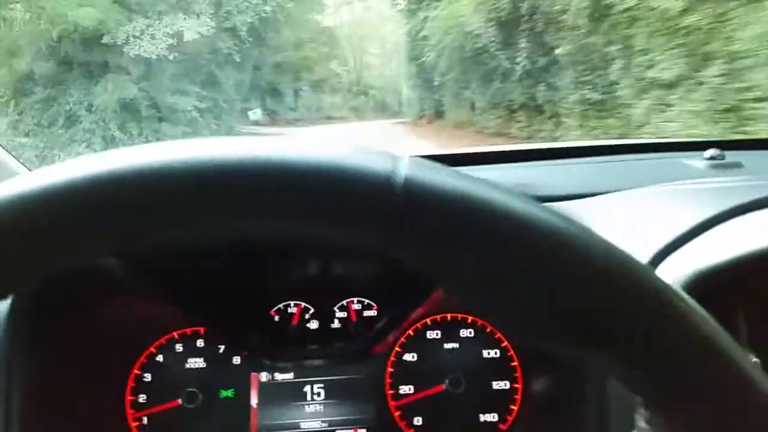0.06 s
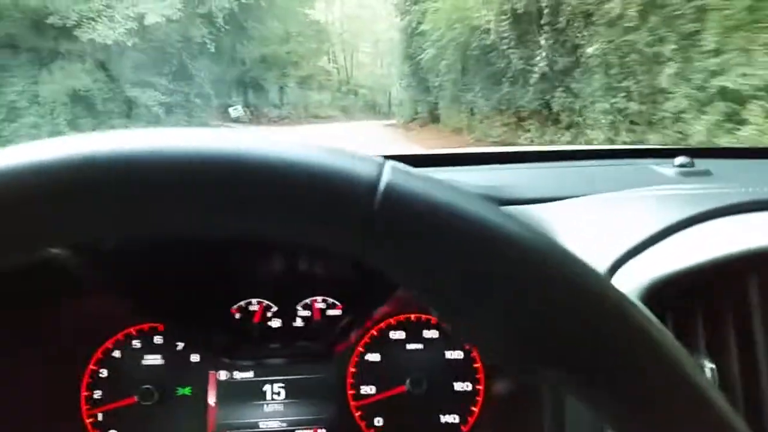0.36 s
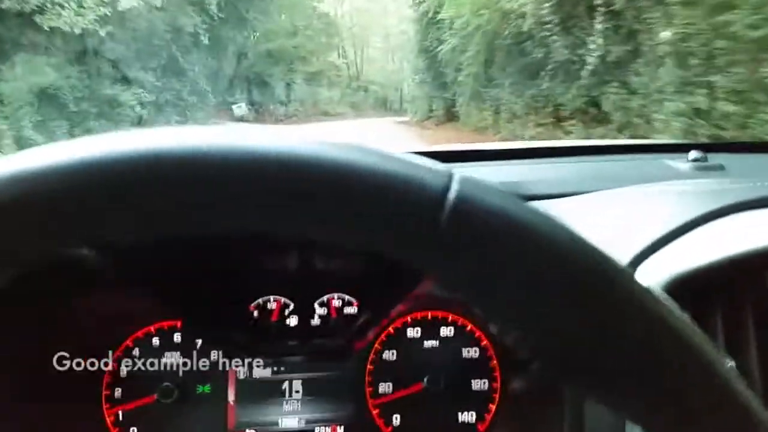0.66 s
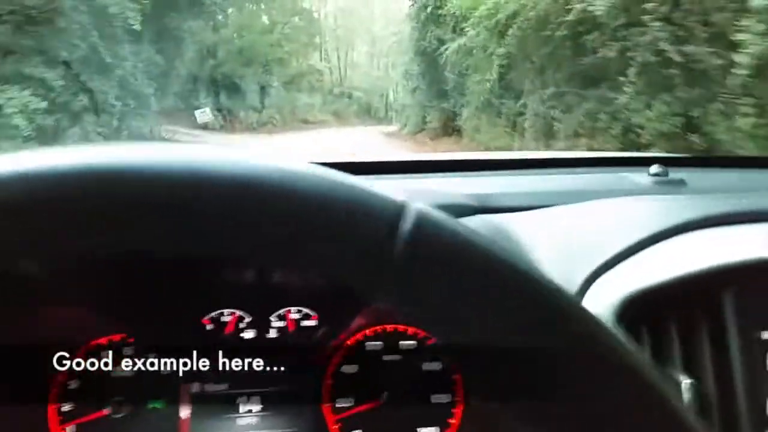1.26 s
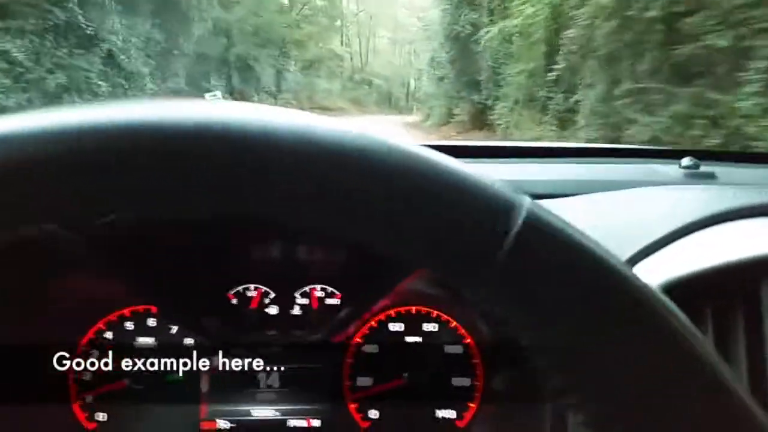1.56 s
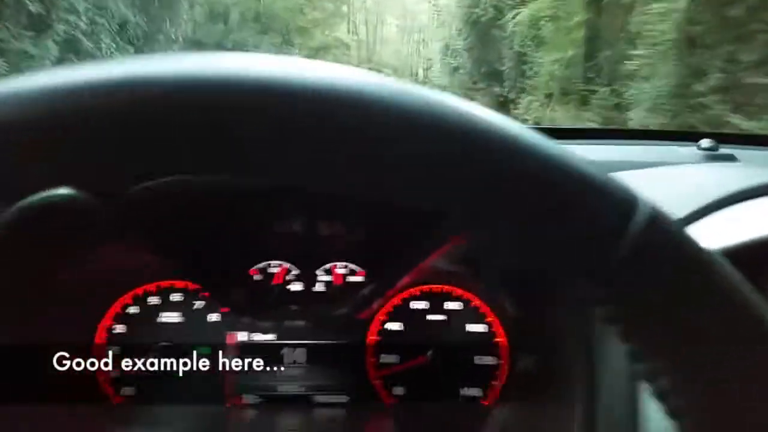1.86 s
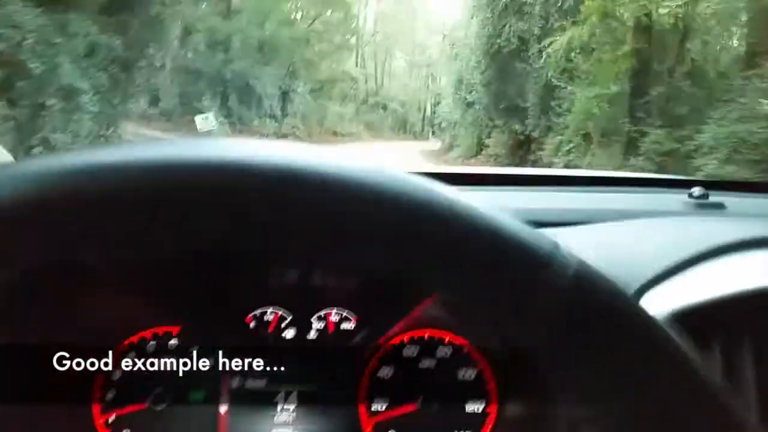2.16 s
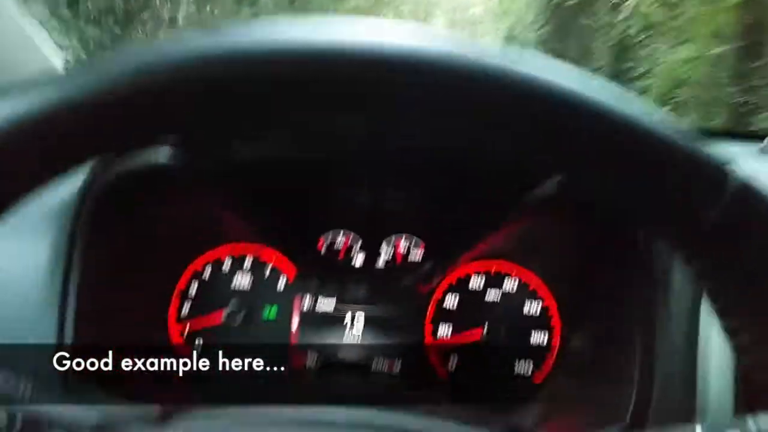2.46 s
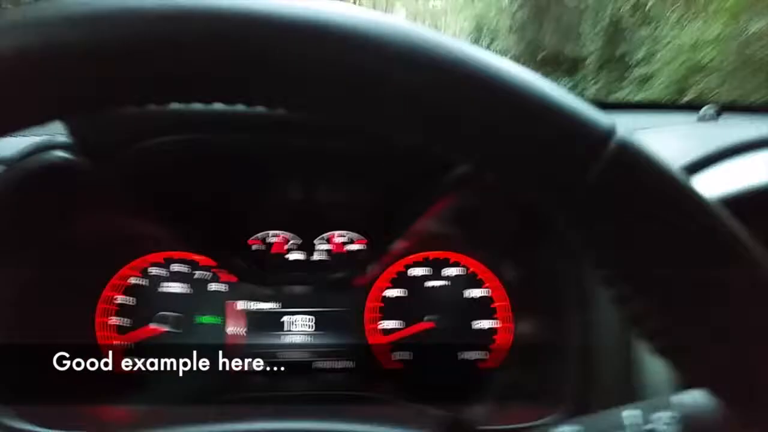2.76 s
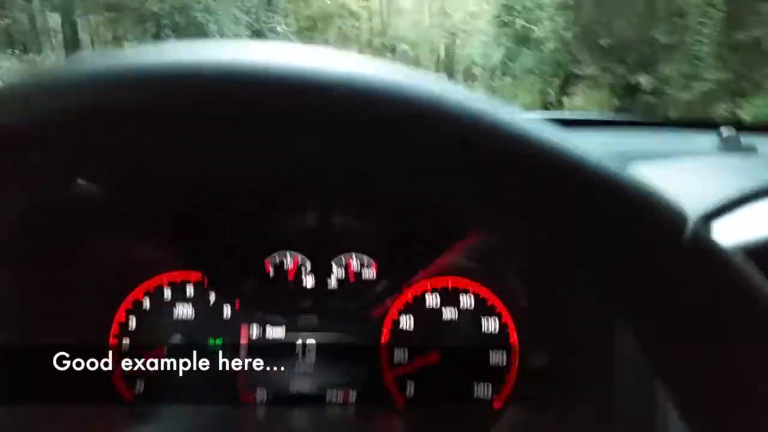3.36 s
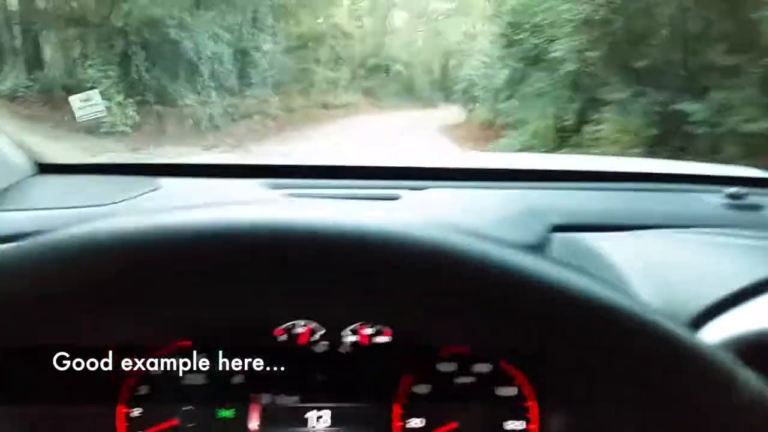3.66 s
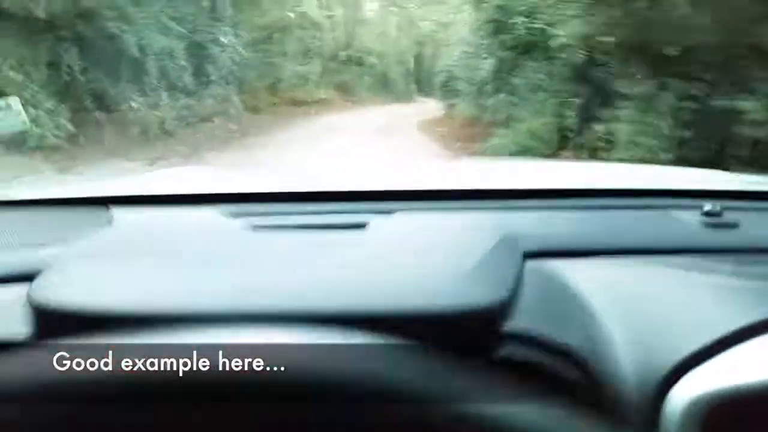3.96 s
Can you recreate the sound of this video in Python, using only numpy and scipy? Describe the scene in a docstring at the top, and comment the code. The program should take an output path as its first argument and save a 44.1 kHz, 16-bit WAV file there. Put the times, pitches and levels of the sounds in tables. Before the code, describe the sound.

A vehicle rumbles slowly over a rough dirt road, heard from the driver's seat, with a low cabin boom and dull tyre roar throughout. The suspension clunks irregularly, most densely between 1 and 2 seconds. At about 2.2 seconds a deep bump brings a brief gravel crunch, plastic rattle and light metal jingle. Another thump lands near 2.8 seconds, and scattered clunks continue until about 3.9 seconds.

```python
"""Driving on a rough dirt road

From the driver's seat of a slow vehicle, you hear uneven ground shake the body and make the cabin boom.
The floor drums, the tyres roar dully on grit, and the suspension clunks at the ruts.
Two deep bumps thump the body. The first also crunches gravel, shakes the plastic trim
and sets small loose metal jingling. A faint hiss lies under it all."""
import sys
import numpy as np
from scipy import signal
from scipy.fft import rfft, irfft
from scipy.io import wavfile
from scipy.ndimage import uniform_filter1d

SR = 44100
rng = np.random.default_rng(int(sys.argv[2]) if len(sys.argv) > 2 else 0)


def log_audio(samples):
    """Write samples as a 16-bit WAV file to the path given in sys.argv[1]."""
    # one column per channel
    frames = np.atleast_2d(samples).T
    # limit to full scale, then quantise
    limited = np.clip(frames, -1, 1)
    pcm = np.round(limited * 32767).astype(np.int16)
    wavfile.write(sys.argv[1], SR, pcm)


N = 176400  # 4 seconds

# How each low sound swells and fades: time_s, relative_level_db
SHUDDER_LEVEL = [(0.0, -21), (0.49, -19), (1.06, -22), (1.28, -16), (1.53, -29), (1.66, -15), (1.79, -34),
                 (1.86, -17), (2.81, -19.5), (2.84, -12.5), (2.95, -20.5), (3.8, -28.5), (3.82, -21),
                 (4.0, -29.5)]  # deep shaking of the body
BOOM_LEVEL = [(0.0, -43), (0.02, -19.5), (0.42, -24), (0.47, -18.5), (0.73, -24), (1.15, -17), (1.2, -21.5),
              (2.05, -18), (2.24, -14), (2.27, -20.5), (2.75, -22), (2.77, -14), (3.07, -21.5), (3.4, -22),
              (3.43, -27.5), (4.0, -23)]  # boom of the cabin
THRUM_LEVEL = [(0.0, -45), (1.73, -38.5), (2.1, -44.5), (2.16, -31), (2.28, -40.5), (2.72, -42),
               (2.81, -28.5), (2.85, -40), (3.39, -51.5), (3.48, -42), (3.94, -48), (4.0, -41)]  # low note of the floor panels
HOLLOW_LEVEL = [(0, -53), (1.0, -53), (1.4, -47), (2.1, -47), (2.2, -42.5), (2.45, -44), (2.72, -49),
                (2.8, -35), (2.9, -48), (3.3, -55), (3.6, -47), (3.85, -46.5), (4, -52)]  # their higher, hollow note
ROAR_LEVEL = [(0.0, -41.5), (1.09, -43), (1.2, -41), (1.84, -41), (2.25, -36.5), (2.56, -40.5), (2.72, -39),
              (2.96, -39.5), (3.14, -44), (3.43, -43.5), (3.68, -43), (4.0, -44)]  # tyres

# The tone of each noise, or how strong it is from low to high: pitch_hz, relative_level_db
RUMBLE_TONE = [(14, -8.5), (26, -1), (35, 4.5), (50, -12), (64, -0.5), (77, -3), (98, -12.5), (124, -6),
               (145, -14), (170, -22), (200, -26.5), (300, -37.5)]  # body and cabin
SCRAPE_TONE = [(300, -4), (420, 2.5), (600, 0), (750, -5), (1000, -13), (1300, -14), (1600, -10.5),
               (1850, -17), (2100, -22), (2500, -35), (4000, -53), (8000, -81)]  # scrape inside a clunk
PANEL_TONE = [(190, -4.5), (235, 2), (270, -4.5), (315, -7), (362, -0.5), (410, -12.5), (460, -12.5)]  # floor panels
ROAR_TONE = [(88, -27.5), (150, 0.5), (163, -3), (187, -16.5), (255, -15.5), (385, -26), (465, -32),
             (551, -33), (701, -30), (764, -37), (818, -36.5), (1110, -46), (1280, -44.5), (1600, -51),
             (2060, -55), (6840, -87.5), (9000, -94), (11700, -113), (19800, -120)]  # tyres
TRIM_TONE = [(900, -1), (1300, -0.5), (1700, 3.5), (2250, 1), (2600, -16), (3500, -22.5), (5000, -37.5),
             (9000, -50)]  # plastic trim
GRAVEL_TONE = [(530, -30.5), (900, 0.5), (1190, -3.5), (1430, -7), (1680, -2), (1840, -10), (2270, -9.5),
               (2600, -12.5), (5100, -32), (9000, -39.5), (11700, -67.5), (19800, -120)]  # crunching gravel
METAL_TONE = [(7000, -30), (9000, -19.5), (10000, -5.5), (10600, 0.5), (11500, -1), (12300, 1.5),
              (13000, -6), (14000, -10), (15600, -8)]  # loose metal
HISS_TONE = [(2940, -34), (5000, -4.5), (7150, -24), (8240, -19), (9640, -13.5), (11900, -0.5),
             (15600, 0.5)]  # microphone hiss

# Thumps of the body over bumps (fade is the time to drop 60 dB): start_s, pitch_hz, level_db, rise_s, fade_s
THUMPS = [(1.101, 70, -14, 0.021, 0.11), (1.939, 128.3, -22, .025, 0.18), (2.125, 92.2, -12, .03, .22),
          (2.197, 69.1, -6, .022, 0.17), (2.755, 126, -8.5, .014, 0.26), (2.78, 162, -19, 0.0195, 0.25),
          (2.765, 410, -31, .02, .2), (2.821, 44, -10, .03, 0.28)]
# Clunks of the suspension: start_s, level_db, hardness_db
CLUNKS = [(.353, -35, 4), (.518, -30, -3), (.597, -37, -3), (0.764, -22.5, 1), (.794, -32, 4),
          (1.082, -21.5, 2), (1.269, -20, 1), (1.305, -33.5, 0), (1.33, -28, 4), (1.347, -22.5, 4),
          (1.392, -29, 4), (1.484, -36, 0), (1.548, -36, -2), (1.587, -32, -2), (1.605, -26.5, 1),
          (1.620, -34.5, 0), (1.636, -29.5, 1), (1.727, -22, 2), (1.814, -24, -4), (1.841, -39.5, 0),
          (1.869, -28, -4), (1.905, -30, -3), (1.926, -35, -3), (1.950, -25, -6), (1.97, -29, -2),
          (1.994, -34.5, -3), (2.060, -34, 0), (2.097, -31.5, -2), (2.179, -29.5, 2), (2.198, -32.5, 0),
          (2.415, -33, 3), (2.448, -23.5, 1), (2.577, -32, -2), (2.622, -30, -2), (2.743, -35.5, -2),
          (2.760, -49.5, 0), (2.798, -31, 0), (2.892, -27, -4), (3.007, -29, -4), (3.053, -34.5, -4),
          (3.093, -32.5, -3), (3.123, -25, -2), (3.453, -32, 4), (3.549, -30.5, -3), (3.628, -39, -2),
          (3.672, -43, -2), (3.818, -22, -2), (3.848, -26, -4)]
# Notes the vehicle's frame rings with at a clunk: pitch_hz, relative_level_db, rise_s, fade_s
FRAME_NOTES = [(238, -15.5, 0.0091, 0.17), (350, -16, .005, 0.15), (443, -12.5, 0.0054, .04),
               (564, -.7, .009, 0.032), (745, -11.5, .006, 0.017), (880, -19, .004, 0.021),
               (1190, -28, .003, .025), (1340, -27, .003, 0.023), (1524, -19.5, 0.0054, 0.031),
               (1578, -20.5, 0.0051, .03), (1970, -34, 0.0025, .02), (2190, -42, 0.0021, .025)]
# Bursts of chatter from the plastic trim: start_s, level_db
TRIM_HITS = [(1.654, -40.5), (1.694, -43.5), (1.851, -54), (1.889, -50.5), (1.975, -48), (2.062, -49.5),
             (2.129, -43), (2.183, -33.5), (2.231, -35.5), (2.283, -38), (2.326, -43), (2.383, -55),
             (2.430, -43), (2.618, -48.5), (2.773, -39.5), (2.992, -48)]
# Small plastic ticks: start_s, pitch_hz, level_db
TRIM_TICKS = [(.553, 5130, -68), (2.406, 5020, -63), (2.992, 3700, -58), (3.584, 13500, -49)]
# Clinks of loose metal: start_s, level_db
CLINKS = [(1.235, -68), (1.371, -65), (1.626, -66), (1.655, -66), (1.695, -69), (2.127, -59), (2.142, -62),
          (2.185, -51), (2.204, -41), (2.222, -55), (2.2355, -44), (2.250, -51), (2.382, -57),
          (2.532, -61.5), (2.6665, -67), (2.775, -68), (2.89, -68), (3.481, -67)]

SHUDDER_TOP_HZ, BOOM_TOP_HZ, THRUM_TOP_HZ, HOLLOW_TOP_HZ = 54, 184.6, 315, 456
BIG_BUMP_S = 2.239  # loose parts rattle hardest here


def rumble(boom_db=-1):
    """Uneven ground shakes the body and makes the cabin boom with its own low notes."""
    shudder = steady(colour(noise(), RUMBLE_TONE, high_hz=SHUDDER_TOP_HZ), samples=6000)
    boom = steady(colour(noise(), RUMBLE_TONE, SHUDDER_TOP_HZ, BOOM_TOP_HZ), samples=3500)
    return shudder * level(SHUDDER_LEVEL) + gain(boom_db) * boom * level(BOOM_LEVEL)


def bumps():
    """Deep bumps set the body booming for a moment."""
    thumps = np.zeros(N)
    for start_s, pitch_hz, level_db, rise_s, fade_s in THUMPS:
        add(thumps, start_s, gain(level_db) * ring(pitch_hz, rise_s, fade_s))
    return thumps


def suspension(scrape_db=-13, detune=0.033, spread_db=3):
    """Each clunk rings the frame. Harder ones bring out more of its other notes and a short scrape."""
    hits = [(start_s, level_db + hardness_db) for start_s, level_db, hardness_db in CLUNKS]
    force = strikes(hits, rise_s=0.006, fade_s=0.085)
    scrape = grains(per_s=3900, spread_db=1.0) * force
    clunks = gain(scrape_db) * colour(scrape, SCRAPE_TONE, low_hz=260)
    for start_s, level_db, hardness_db in CLUNKS:
        for pitch_hz, note_db, rise_s, fade_s in FRAME_NOTES:
            pitch_luck, level_luck = rng.uniform(-1, 1, 2)  # no two clunks are alike
            is_main_note = 480 < pitch_hz < 660
            extra_db = (0 if is_main_note else hardness_db) + spread_db * level_luck
            note = ring(pitch_hz * (1 + detune * pitch_luck), rise_s, fade_s)
            add(clunks, start_s, gain(level_db + note_db + extra_db) * note)
    return cabin_echo(clunks, echo_db=-14, fade_s=0.18)


def floor_panels(hollow_db=-0.5):
    """Lumps in the road drum on the floor, which answers with a low thrum and a hollow note."""
    thrum = steady(colour(noise(), PANEL_TONE, BOOM_TOP_HZ, THRUM_TOP_HZ), samples=2500)
    hollow = steady(colour(noise(), PANEL_TONE, THRUM_TOP_HZ, HOLLOW_TOP_HZ), samples=2500)
    return thrum * level(THRUM_LEVEL) + gain(hollow_db) * hollow * level(HOLLOW_LEVEL)


def tyres(roar_db=-7.3, flutter_db=1.5):
    """Grit under the tread blurs into a roar, muffled by the floor."""
    grit = grains(per_s=12000, spread_db=0.8)
    roar = unit(colour(grit, ROAR_TONE, low_hz=420))
    return roar * level(ROAR_LEVEL) * gain(roar_db + flutter_db * wander(rate_hz=25))


def plastic_trim(tick_cycles=55):
    """Plastic panels chatter in short bursts and tick now and then."""
    force = strikes(TRIM_HITS, rise_s=0.002, fade_s=0.047)
    chatter = colour(grains(per_s=8000, spread_db=1.1) * force, TRIM_TONE, low_hz=850)
    for start_s, pitch_hz, level_db in TRIM_TICKS:
        tick = ring(pitch_hz, rise_s=0.0003, fade_s=tick_cycles / pitch_hz)
        add(chatter, start_s, gain(level_db) * tick)
    return cabin_echo(chatter, echo_db=-10.5, fade_s=0.17)


def gravel():
    """Loose stones crunch under the wheel at the big bump."""
    force = shake(peak_db=-44, build_s=0.033, settle_s=0.097)
    crunch = colour(grains(per_s=1100, spread_db=1.5) * force, GRAVEL_TONE, low_hz=800)
    return cabin_echo(crunch, echo_db=-6.5, fade_s=0.072)


def loose_metal():
    """Small metal pieces clink together and go on shivering faintly after the big bump."""
    jingle = shake(peak_db=-51, build_s=0.025, settle_s=0.065)
    shiver = shake(peak_db=-70.5, build_s=0.1, settle_s=0.6)
    clinks = strikes(CLINKS, rise_s=0.001, fade_s=0.06)
    force = np.sqrt(jingle ** 2 + shiver ** 2 + clinks ** 2)
    metal = colour(grains(per_s=12000, spread_db=1.0) * force, METAL_TONE, low_hz=8000)
    ping = gain(-40) * ring(pitch_hz=12200, rise_s=0.003, fade_s=0.07)  # left by a hard clink
    add(metal, start_s=2.233, sound=ping)
    return cabin_echo(metal, echo_db=-8.5, fade_s=0.18)


def hiss(level_db=-74):
    """The microphone adds a faint, steady hiss."""
    return gain(level_db) * colour(noise(), HISS_TONE, low_hz=4840)


def cabin_echo(sound, echo_db, fade_s):
    """Adds the short, crowded echoes of a padded cabin, starting after 8 ms."""
    t = np.arange(SR // 3) / SR
    tail = rng.standard_normal(len(t)) * gain(-60 * t / fade_s) * (t > 0.008)
    return sound + gain(echo_db) * signal.fftconvolve(sound, tail / np.linalg.norm(tail))[:N]


def gain(db):
    """Turns decibels into a number to multiply by."""
    return 10 ** (np.asarray(db) / 20)


def unit(sound):
    """Scales a sound to an average strength (rms) of 1."""
    return sound / np.sqrt(np.mean(sound ** 2) + 1e-20)


def clock():
    """The time of every sample, in seconds."""
    return np.arange(N) / SR


def level(points):
    """Joins (time_s, level_db) points into a volume curve."""
    return gain(np.interp(clock(), *np.transpose(points)))


def add(mix, start_s, sound):
    """Mixes a sound in at the given time."""
    part = mix[max(round(start_s * SR), 0):][:len(sound)]
    part += sound[:len(part)]


def noise():
    """White noise: all pitches, equally strong."""
    return rng.standard_normal(N)


def colour(sound, tone, low_hz=None, high_hz=None):
    """Shapes a sound with a tone table, cutting steeply below low_hz and above high_hz."""
    hz = np.fft.rfftfreq(N, 1 / SR) + 1e-3
    pitch_hz, level_db = np.transpose(tone)
    shape = gain(np.interp(np.log(hz), np.log(pitch_hz + 0.0011), level_db))
    if low_hz:
        shape /= np.sqrt(1 + (low_hz / hz) ** 12)
    if high_hz:
        shape /= np.sqrt(1 + (hz / high_hz) ** 12)
    return irfft(rfft(sound) * unit(shape), N)


def wander(rate_hz):
    """A smooth, random drift up and down."""
    hz = np.fft.rfftfreq(N, 1 / SR)
    return unit(irfft(rfft(noise()) * np.exp(-(hz / rate_hz) ** 2), N))


def grains(per_s, spread_db):
    """Tiny impacts of uneven size at random times."""
    size = gain(spread_db * np.minimum(rng.exponential(1, N), 4))
    return unit(noise() * size * (rng.random(N) < per_s / SR))


def steady(sound, samples):
    """Evens out the slow swells of a noise and keeps its quick flutter."""
    power = uniform_filter1d(uniform_filter1d(sound ** 2, samples), samples)
    return sound / np.sqrt(power + 1e-20)


def ring(pitch_hz, rise_s, fade_s):
    """One pure note that swells, then drops 60 dB in fade_s."""
    t = np.arange(SR // 2) / SR
    swell = np.sin(np.pi / 2 * np.minimum(t / rise_s, 1)) ** 2
    fade = gain(-60 * np.maximum(t - rise_s, 0) / fade_s)
    return swell * fade * np.sin(2 * np.pi * pitch_hz * (t - rise_s))


def strikes(hits, rise_s, fade_s):
    """The volume curve of a row of short hits."""
    t, power = np.arange(SR // 2) / SR, np.zeros(N)
    for start_s, level_db in hits:
        hit = np.minimum(t / rise_s, 1) * gain(level_db - 60 * t / fade_s)
        add(power, start_s, hit ** 2)
    return np.sqrt(power)


def shake(peak_db, build_s, settle_s):
    """The volume curve of a rattle that builds and settles around the big bump."""
    t = clock() - BIG_BUMP_S
    return gain(peak_db) * np.exp(np.minimum(t / build_s, -t / settle_s))


def scene():
    """Everything heard at the driver's seat, in one channel."""
    ride = rumble() + floor_panels() + tyres() + suspension() + bumps()
    rattles = plastic_trim() + gravel() + loose_metal()
    return (ride + rattles + hiss())[None]


def record(dry, edge_s=0.012, cutoff_hz=15800):
    """Softens the start and end, then cuts the very highest treble."""
    from_edge_s = np.minimum(clock(), clock()[::-1])
    fade = np.sin(np.pi / 2 * np.minimum(from_edge_s / edge_s, 1))
    treble_cut = signal.firwin(511, cutoff_hz, window=("kaiser", 9), fs=SR)
    return signal.oaconvolve(dry * fade, treble_cut[None], "same")


dry = scene()
out = record(dry)
log_audio(out)
```